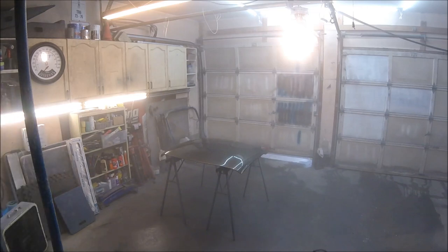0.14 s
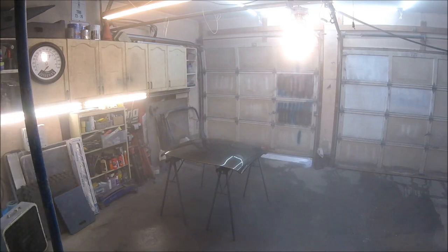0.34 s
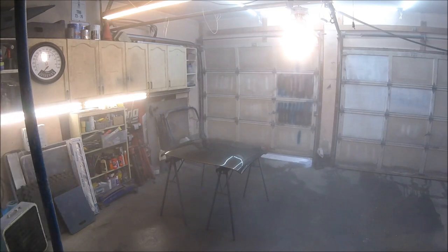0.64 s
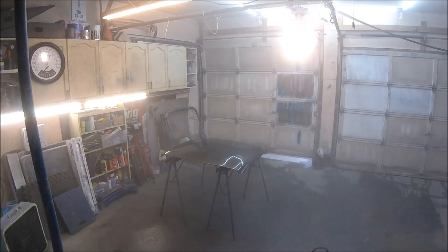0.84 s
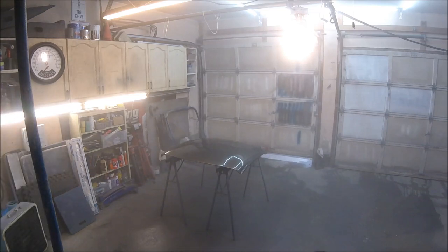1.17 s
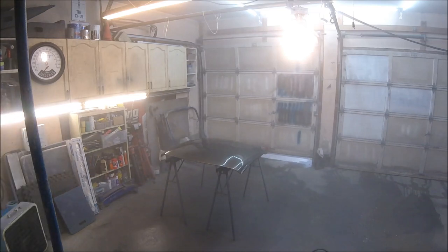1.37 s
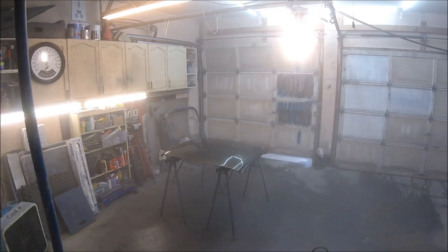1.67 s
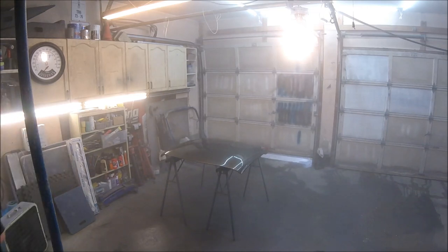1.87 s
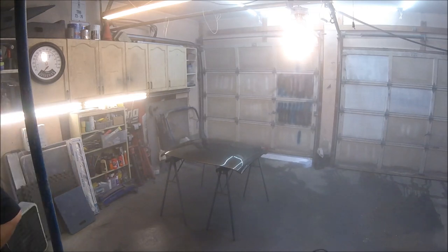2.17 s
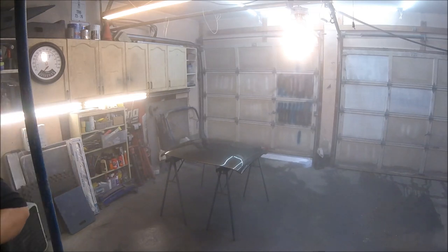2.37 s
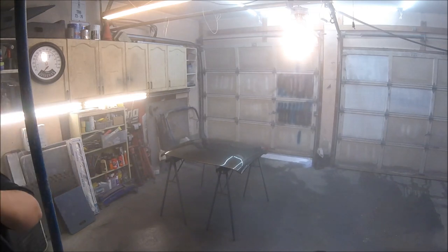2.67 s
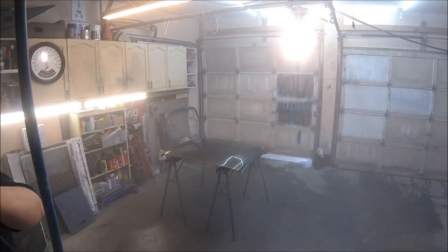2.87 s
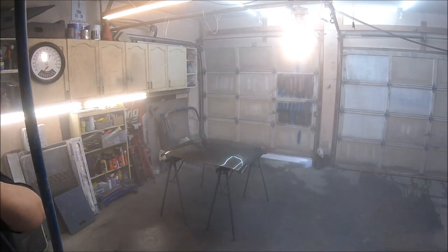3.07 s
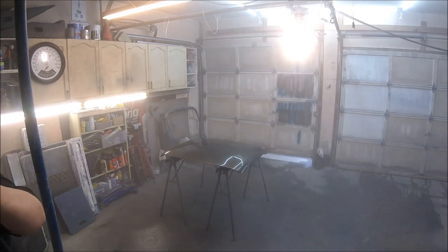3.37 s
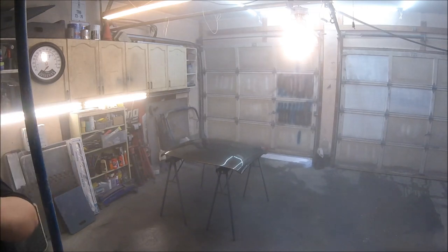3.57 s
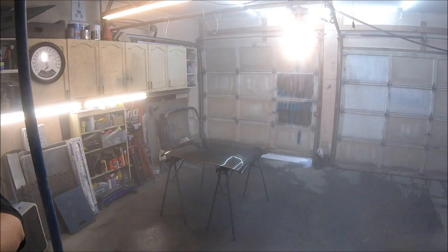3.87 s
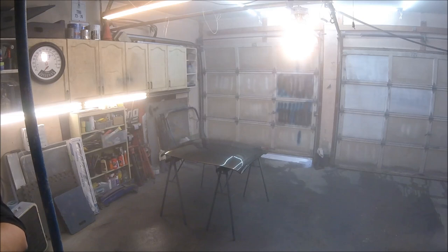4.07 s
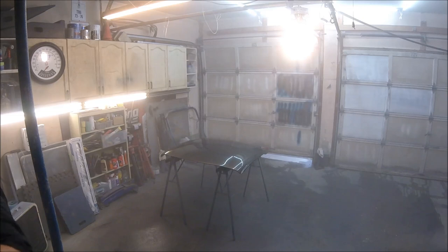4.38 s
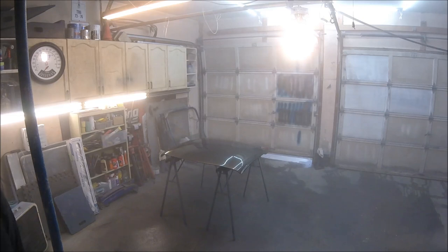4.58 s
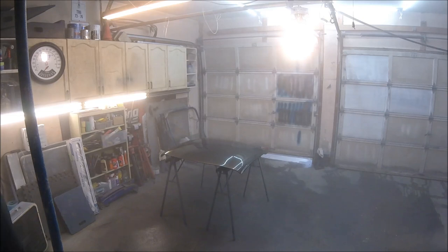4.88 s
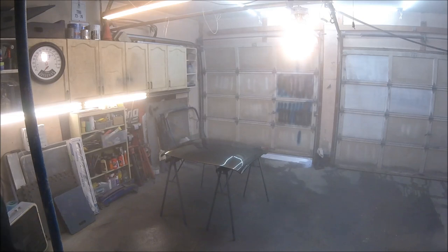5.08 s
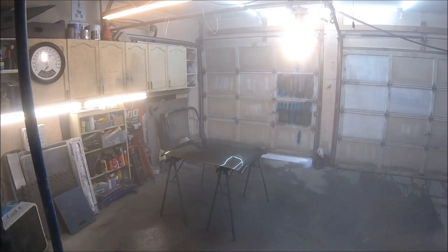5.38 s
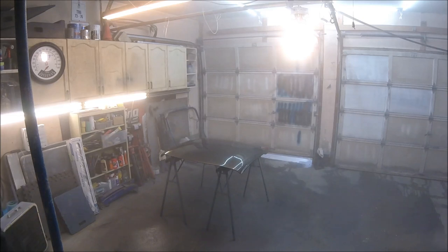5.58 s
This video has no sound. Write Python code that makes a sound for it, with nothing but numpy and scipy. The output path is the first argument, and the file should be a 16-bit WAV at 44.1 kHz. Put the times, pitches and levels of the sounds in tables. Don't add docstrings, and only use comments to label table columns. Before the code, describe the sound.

A loud, rapid compressor clatter fills the whole clip, low and throbbing with a buzzing metal edge and airy intake noise. An early quick blast of compressed air cuts through, its tail fading fast in the garage, and automatic gain briefly pushes the machine down. Midway come two firm knocks with light bouncing taps between them. The machine then carries on to the end, heard centered from a few steps away.

```python
import sys
import numpy as np
from scipy import signal
from scipy.fft import rfft, irfft, next_fast_len
from scipy.io import wavfile
from scipy.ndimage import uniform_filter1d, minimum_filter1d, map_coordinates

SR = 44100
rng = np.random.default_rng(int(sys.argv[2]) if len(sys.argv) > 2 else 0)


def master_out(mix):
    frames = np.transpose(np.atleast_2d(mix))
    ceiling = np.clip(frames, -1, 1)
    pcm = np.round(ceiling * 32767).astype(np.int16)
    wavfile.write(sys.argv[1], SR, pcm)


def boost_factor(decibels):
    exponent = np.asarray(decibels, float) / 20
    return 10 ** exponent


N = 252685

CRANK_HZ = 15.4645
STROKE_AT_S, VALVE_AT_S, MOTOR_AT_S = .0068, .0215, .0018


def seconds():
    return np.arange(N) / SR


def unit(x):
    return x / np.sqrt(np.mean(x ** 2) + 1e-20)


def along(points, hz):
    f, v = np.transpose(points)
    return np.interp(np.log(hz + 1), np.log(f + 1), v)


def wobble(rate_hz):
    knots = rng.standard_normal(int(N * rate_hz / SR) + 4)
    return map_coordinates(knots, [np.arange(N) * rate_hz / SR])


def noise(response):
    m = next_fast_len(N)
    spectrum = rfft(rng.standard_normal(m)) * response(np.fft.rfftfreq(m, 1 / SR))
    return unit(irfft(spectrum, m)[:N])


def patches(x, depth_db):
    z = signal.stft(x, nperseg=512)[2]
    field = uniform_filter1d(rng.standard_normal(z.shape), size=8, axis=0)
    field = uniform_filter1d(field, size=50, axis=1)
    return unit(signal.istft(z * boost_factor(depth_db * unit(field)), nperseg=512)[1][:N])


# (frequency [Hz], level [dB per Hz])
FAN_AIR = [(20, -24), (45, -17.5), (110, -9.5), (450, -15.5), (1200, -20.5), (1900, -19), (2500, -14.5),
           (3000, -17.5), (4100, -15.5), (5500, -22), (7000, -24.5), (9000, -36.5), (10800, -47.5),
           (12000, -54)]
# (frequency [Hz], width [Hz], level [dB])
HEAD_RESONANCES = [
    (6515, 240, -41),
    (2033, 45, -48.5),
    (107.5, 130, -41),
]


def air():
    stroke = 4 * np.pi * CRANK_HZ * (seconds() - VALVE_AT_S)
    pulse_db = .6 * np.cos(stroke + 3.6) + .6 * np.cos(2 * stroke + .6)
    fan = patches(noise(lambda hz: boost_factor(along(FAN_AIR, hz))), depth_db=1.3)
    rush = boost_factor(-28 + pulse_db + .3 * wobble(9)) * fan
    for c_hz, w_hz, db in HEAD_RESONANCES:
        band = noise(lambda f: 1 / (1 + ((f - c_hz) / w_hz * 2) ** 4))
        rush += boost_factor(db + 2.0 * pulse_db + 0.42 * wobble(7.1)) * band
    return rush


# (frequency [Hz], level [dB rms])
MOTOR_TONES = [(58.42, -35), (49.64, -41), (120.01, -41), (150.93, -40), (181.9, -45), (53.11, -49),
               (105.18, -49), (243.78, -51)]


def motor():
    t = seconds() - MOTOR_AT_S
    hum = np.zeros(N)
    for hz, db in MOTOR_TONES:
        hum += boost_factor(db + 2.5 + 0.31 * wobble(2.3)) * np.cos(2 * np.pi * hz * t)
    return hum


DETUNE = .012


def ring(modes, t):
    total = np.zeros(len(t))
    for hz, db, t60 in modes:
        decay = boost_factor(db + rng.normal(0, 1.2) - 60 * t / t60)
        total += decay * np.sin(2 * np.pi * hz * (1 + DETUNE * rng.normal()) * t)
    return total


# (time [s], peak level [dB], brightness [dB], thump [dB])
KNOCKS = [
    (2.8505, -12.5, -1, -10),
    (2.9580, -22, 2, -4),
    (2.9705, -26, 7, -6),
    (3.0057, -12, -10, -10),
]
# (frequency [Hz], level [dB], t60 [s])
LOW_MODES = [(1185, 0, .045), (1030, -2, .03), (1340, -6, .035)]
# (frequency [Hz], level [dB], t60 [s])
HIGH_MODES = [(1720, -3, .025), (2050, 0, .015)]
# (frequency [Hz], level [dB], t60 [s])
BENCH_MODES = [(105, 3, 0.12), (293, -6, 0.19), (397, -6, .1)]
# (delay [s], level [dB])
WALLS = [(.0092, -8), (.021, -11), (.033, -20)]
# (frequency [Hz], level [dB per Hz])
CLATTER = [(700, -36), (950, -3), (1200, 3), (1750, -4), (2300, -23)]
CLATTER_DB, CLATTER_T60_S = -7, 0.09


def knocks():
    out, t = np.zeros(N), np.arange(SR // 4) / SR
    clatter = noise(lambda hz: boost_factor(along([(300, -120)] + CLATTER + [(5000, -120)], hz)))
    for s, db, bright_db, thump_db in KNOCKS:
        for delay, wall_db in [(0.0017, 0)] + WALLS:
            hit = ring(LOW_MODES, t) + boost_factor(bright_db) * ring(HIGH_MODES, t)
            hit = hit * (1 - np.exp(-t / .0007))
            out[round((s + delay) * SR):][:len(t)] += boost_factor(db - 2.0 + wall_db) * hit
        at = round(s * SR)
        loose = clatter[at:][:len(t)] * boost_factor(CLATTER_DB - 60 * t / CLATTER_T60_S)
        loose = loose * (1 - np.exp(-t / 0.0057))
        out[at:][:len(t)] += boost_factor(db) * (loose + boost_factor(thump_db) * ring(BENCH_MODES, t))
    return out


TRIGGER_S, OPENING_S = 0.48, 0.054
FLOW_DB, FADE_DB_PER_S = -14, 116
FLUTTER_S, FLUTTER_DB = .068, 1


def flow():
    t = seconds() - TRIGGER_S
    opening = np.sin(np.pi / 2 * np.clip(t / OPENING_S, 0, 1)) ** 1.8
    since = np.clip(t - OPENING_S, 0, None)
    flutter_db = FLUTTER_DB * np.cos(2 * np.pi * since / FLUTTER_S)
    return opening * boost_factor(FLOW_DB - FADE_DB_PER_S * since + flutter_db)


# (frequency [Hz], level [dB per Hz])
JET = [(700, -45), (1300, -18), (2100, -13), (3000, -8), (3800, -6), (5300, -4), (5900, -0.5), (6400, 3.5),
       (7100, -7.5), (9000, -10.5), (11000, -13.5), (11400, -18), (13400, -31)]
WHISTLE_LOST = 0.41


def spray():
    body = noise(lambda hz: boost_factor(along(JET, hz)))
    treble = signal.butter(2, 9000, "high", fs=SR, output="sos")
    nozzle = signal.butter(2, [5600, 7000], "band", fs=SR, output="sos")
    top = signal.sosfiltfilt(treble, body)
    whistle = signal.sosfiltfilt(nozzle, body)
    fading = 1 - boost_factor(-60 * np.clip(seconds() - .54, 0, None))
    return flow() * boost_factor(0.75 * wobble(88.6)) * (body - fading * (top + WHISTLE_LOST * whistle))


SAG_HZ_PER_S, MEAN_SPEED_S = .00078, 3.3


def turn(orders, phases, start=0):
    size = 2 ** 14
    k, db = np.transpose(orders)
    lines = np.zeros(size // 2 + 1, complex)
    lines[k.astype(int)] = -1j * boost_factor(db) * np.exp(1j * phases) * size / np.sqrt(2)
    t = seconds()
    sag = SAG_HZ_PER_S / 2 * ((t - MEAN_SPEED_S) ** 2 - 3)
    angle = ((t - start) * CRANK_HZ - sag) % 1
    return np.interp(angle * size, np.arange(size), irfft(lines), period=size)


def chance(count):
    return rng.uniform(0, 2 * np.pi, count)


def smeared(orders):
    return .265 * (orders - 38) ** 2 + np.pi * (orders % 8 == 2)


# (crank order, level [dB rms])
THUD = [(2, -28), (3, -44), (4, -24), (6, -49), (7, -44), (10, -44), (12, -32), (13, -46), (14, -39),
        (15, -45), (16, -35), (18, -36), (19, -50), (20, -37), (22, -39), (23, -46), (24, -48), (26, -46),
        (28, -42), (30, -47)]
PORT_LAG_S = .0023


def thuds():
    orders = np.transpose(THUD)[0]
    push = -2 * np.pi * CRANK_HZ * PORT_LAG_S * orders + np.pi * (orders < 12)
    push += (.4 + np.pi * (orders > 17)) * (orders % 2) + .55 * np.cos(np.pi / 2 * orders)
    phases = np.where(orders < 24, push * (orders > 4), smeared(orders))
    return turn(THUD, phases, STROKE_AT_S) * boost_factor(0.35 + 0.18 * wobble(4.17))


# (time [s], extra path [m])
BODY = [(0, .1), (.9, 0.13), (1.2, .149), (2, 0.15), (2.6, 0.12), (3.2, 0.097), (4.1, 0.12), (4.7, .025),
        (5.2, .046), (5.73, 0.12)]


def reflected(order, share, best_m, db):
    s, extra_m = np.transpose(BODY)
    path_m = np.interp(seconds(), s, extra_m) - best_m
    echo = np.clip(share, 0, 1) * np.exp(2j * np.pi * order * CRANK_HZ * path_m / 343)
    return boost_factor(db) * abs(1 + echo)


# (crank order, level [dB rms])
TANK = [(32, -50), (34, -44), (35, -50), (36, -42), (38, -46), (39, -43), (40, -49), (41, -41), (42, -46),
        (45, -44), (46, -46), (48, -49), (52, -50), (53, -46), (54, -47), (62, -49), (70, -49), (72, -46),
        (84, -50), (100, -50), (106, -51), (109, -49), (120, -49), (122, -45)]
# (reflected share, path of best adding [m], level [dB])
MIRROR = [
    (0.96, .001, -0.9),
    (0.4, 0.15, 1.5),
]
TANK_DB, TANK_DB_PER_S = 0, 0.23


def tank():
    moving = [row for row in TANK if row[0] in (72, 122)]
    still = [row for row in TANK if row not in moving]
    level_db = TANK_DB + TANK_DB_PER_S * seconds() + 0.51 * wobble(4.87)
    boom = turn(still, smeared(np.transpose(still)[0]), STROKE_AT_S) * boost_factor(level_db)
    for row, echo in zip(moving, MIRROR):
        boom += turn([row], 0) * reflected(row[0], *echo)
    return boost_factor(0.23) * boom


# (crank order, level [dB rms])
COVER = [(176, -51), (178, -52), (188, -52), (202, -54), (206, -46), (212, -54), (230, -50), (234, -54),
         (240, -53), (260, -54), (278, -54), (288, -51), (312, -54), (322, -55), (332, -57), (348, -58),
         (364, -60), (370, -60), (372, -59), (386, -61), (416, -55), (418, -57), (420, -56), (424, -55)]


def covers():
    return boost_factor(3.0) * turn(COVER, chance(len(COVER))) * boost_factor(1.2 * wobble(6))


# (crank order, level [dB rms])
VALVE = [(126, -54), (131, -54), (132, -42), (133, -48), (134, -36.5), (136, -39), (138, -46), (139, -48),
         (140, -44), (142, -54), (144, -49), (146, -46), (148, -47), (150, -46), (151, -54), (152, -53)]
VALVE_DB, VALVE_DB_PER_S = -2.5, 0.4


def valve():
    orders, db = np.transpose(VALVE)
    weak = db < -42.5
    phases = np.pi * (orders > 137) + rng.normal(0, .5, len(VALVE)) * weak
    level_db = VALVE_DB + VALVE_DB_PER_S * seconds() + .7 * wobble(5.4) + 1.06 * wobble(31)
    return boost_factor(2.3) * turn(VALVE, phases, VALVE_AT_S) * boost_factor(level_db)


# (frequency [Hz], level [dB per order])
RATTLE = [(60, -86), (300, -62.5), (650, -52.5), (1100, -61.5), (1600, -59), (2150, -54), (3000, -62.5),
          (4200, -56.5), (5500, -63), (6100, -61.5), (6500, -83), (6900, -67), (9000, -76.5),
          (12000, -100.5)]


def rattle():
    taken = [row[0] for row in THUD + TANK + VALVE + COVER]
    rest = np.setdiff1d(np.arange(5, 760), taken)
    total = np.zeros(N)
    for part in (rest[::2], rest[1::2]):
        scatter_db = np.clip(rng.normal(0, 4.5, len(part)), -15, 6)
        sizes_db = along(RATTLE, part * CRANK_HZ) + scatter_db
        total += turn(np.c_[part, sizes_db], chance(len(part))) * boost_factor(2.37 * wobble(7))
    return total


def pump():
    return thuds() + tank() + covers() + valve() + rattle()


OPEN_DB, DUCK_DB, SETTLE_DB = 0.96, -3, 0
DUCK_S, DUCK_FALL_S, DUCK_HOLD_S, RECOVER_S = 0.463, .011, 0.23, 1.48


def gain():
    t = seconds() - DUCK_S
    recovery = np.exp(-np.clip(t - DUCK_HOLD_S, 0, None) / RECOVER_S)
    ducked_db = SETTLE_DB + (DUCK_DB - SETTLE_DB) * recovery
    return boost_factor(OPEN_DB + (ducked_db - OPEN_DB) * np.clip(t / DUCK_FALL_S, 0, 1))


# (frequency [Hz], level [dB per bin])
MASK = [(7000, -75), (7500, -69.5), (8500, -71), (9500, -76), (10200, -80.5), (10800, -84), (11200, -84),
        (11600, -82), (13500, -84)]


def mask_treble(x):
    hz, _, z = signal.stft(x, SR, nperseg=2048)
    local = uniform_filter1d(abs(z) ** 2, size=3, axis=-2)
    local = uniform_filter1d(local, size=2, axis=-1)
    lowest_hz = MASK[0][0]
    treble = local[:, hz > lowest_hz].mean(axis=1, keepdims=True) + 1e-20
    masking = (minimum_filter1d(treble, size=3, axis=-1) / np.median(treble)) ** .8
    loud_enough = local > masking * boost_factor(2 * along(MASK, hz))[:, None]
    heard = loud_enough | (hz < lowest_hz)[:, None]
    return signal.istft(z * heard, SR, nperseg=2048)[1][..., :N]


def scene():
    mono = air() + motor() + knocks() + spray() + pump()
    return np.array([mono, mono])


def roll_off(x):
    return signal.sosfilt(signal.butter(12, 13520, fs=SR, output="sos"), x)


def record(dry):
    mix = mask_treble(dry * gain())
    return roll_off(mix)


dry = scene()
out = record(dry)
master_out(out)
```